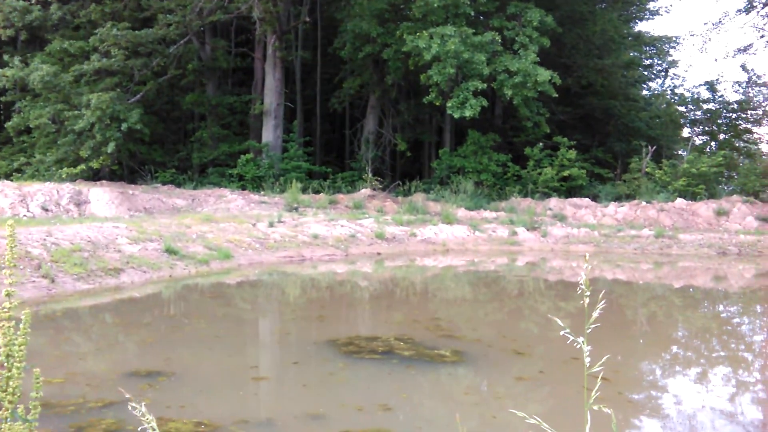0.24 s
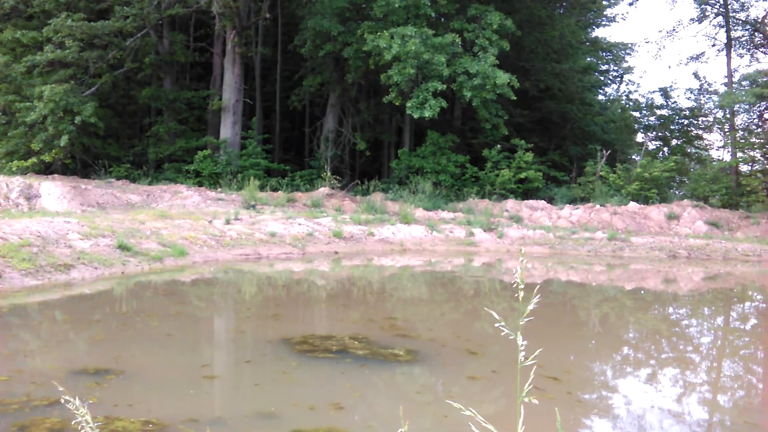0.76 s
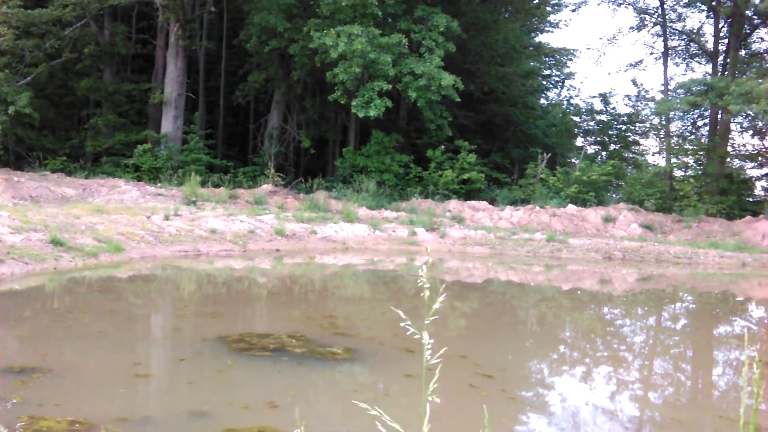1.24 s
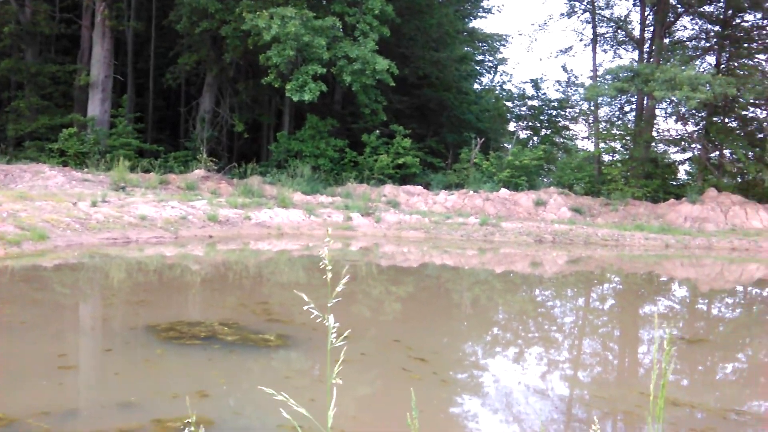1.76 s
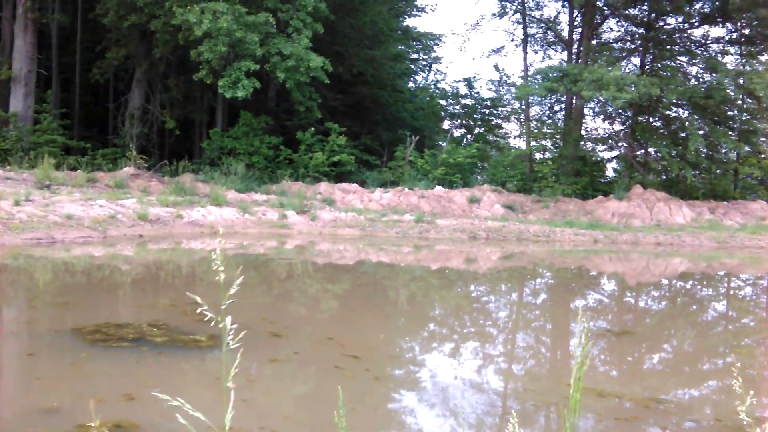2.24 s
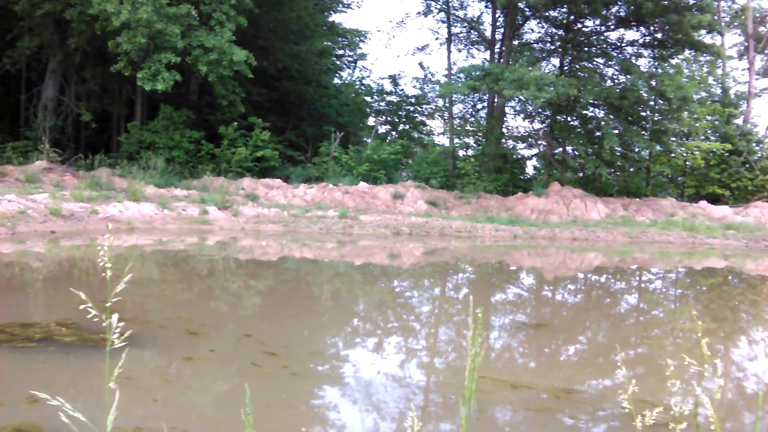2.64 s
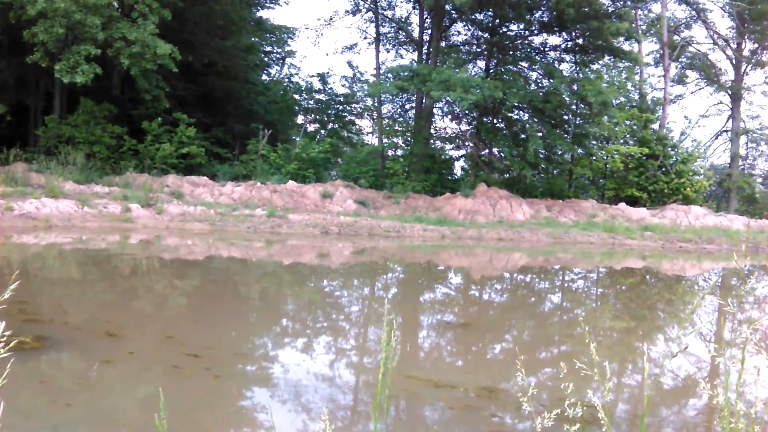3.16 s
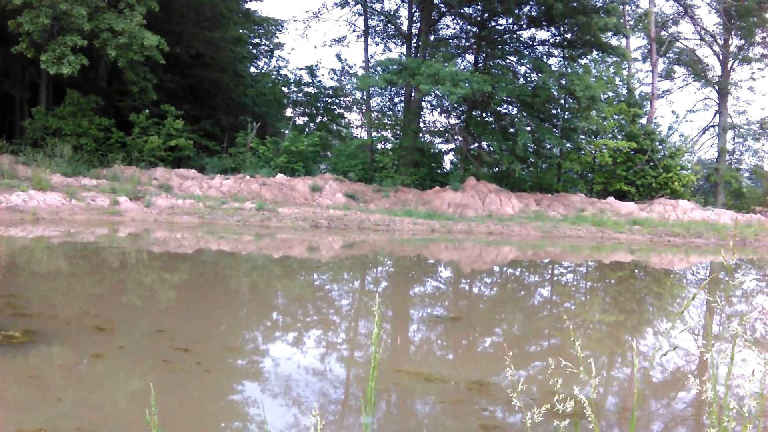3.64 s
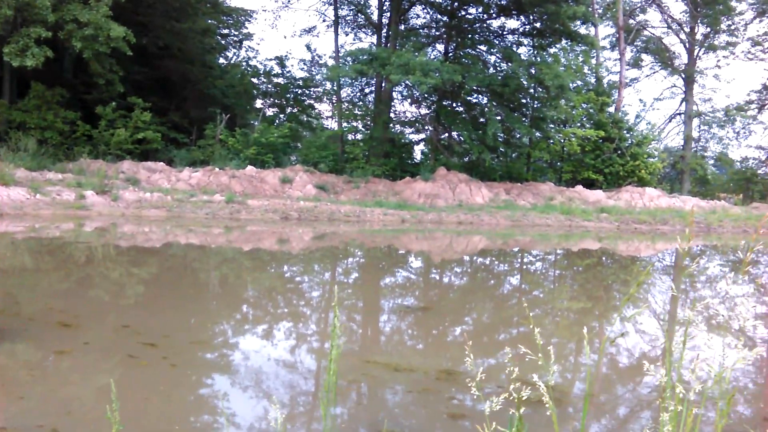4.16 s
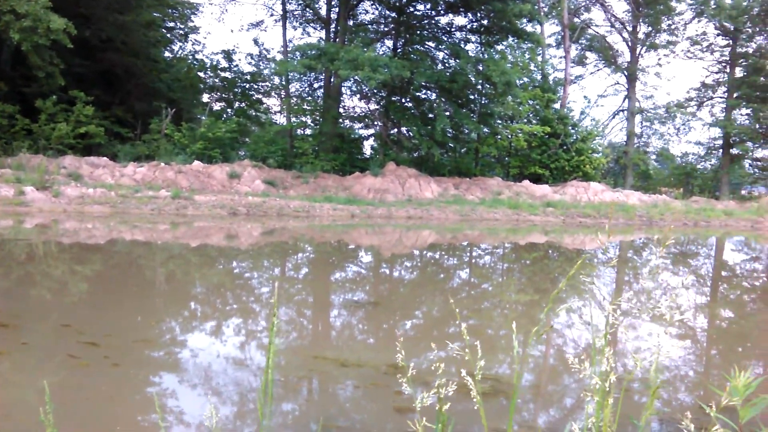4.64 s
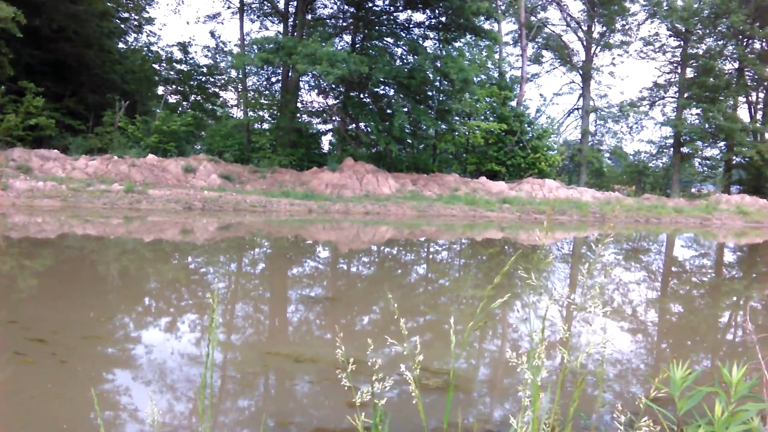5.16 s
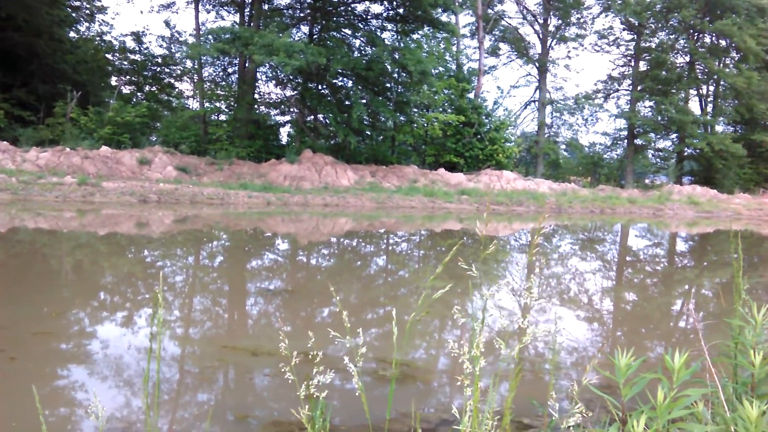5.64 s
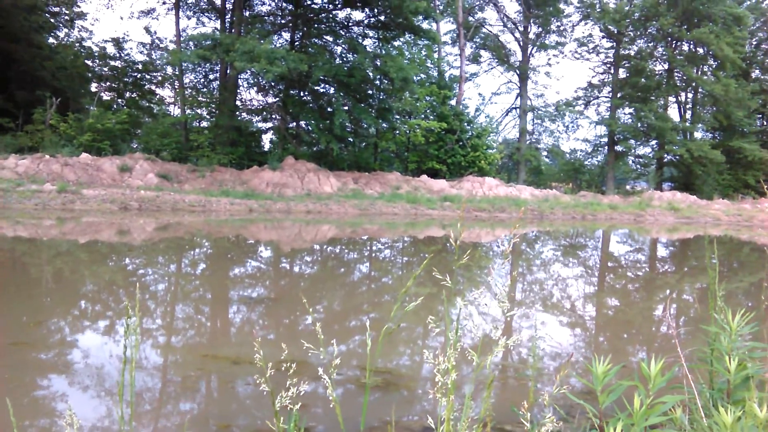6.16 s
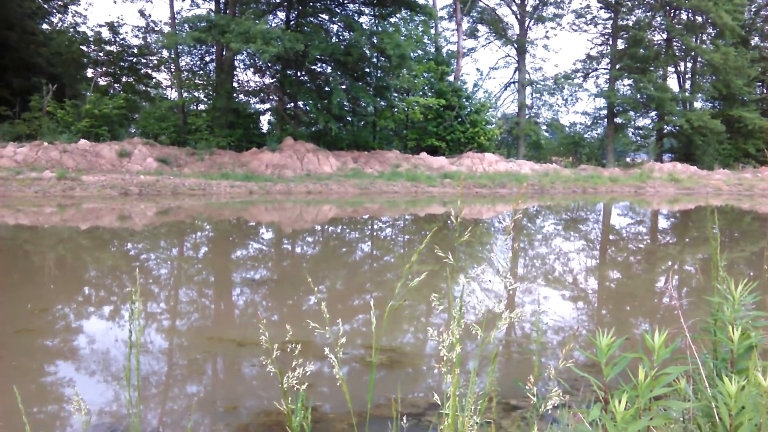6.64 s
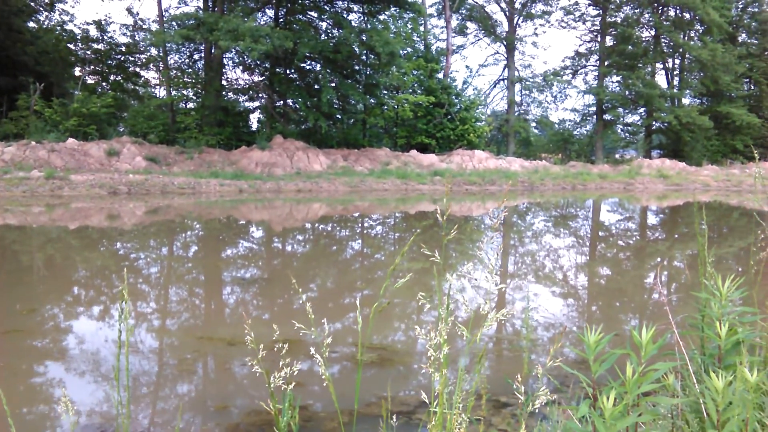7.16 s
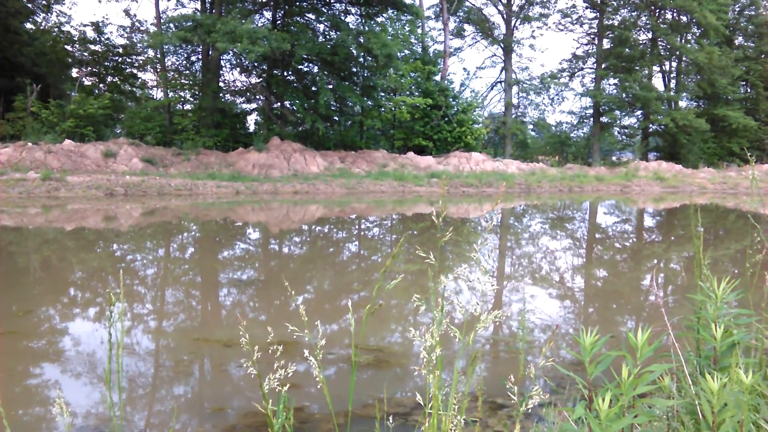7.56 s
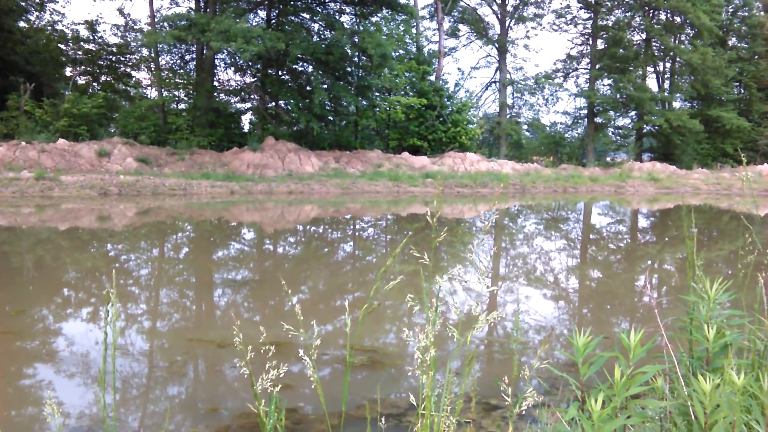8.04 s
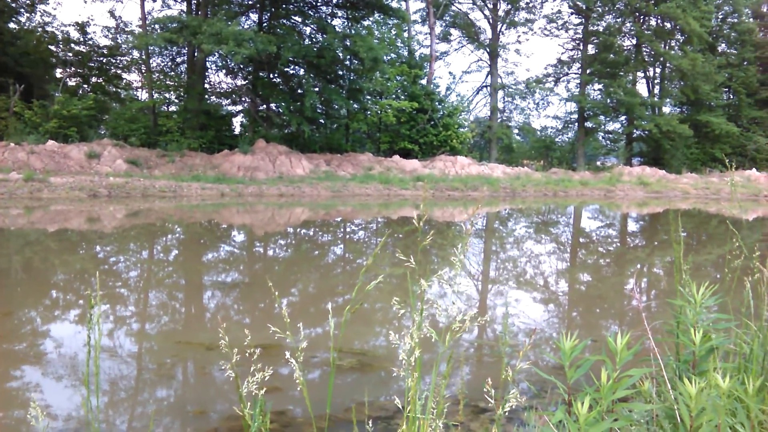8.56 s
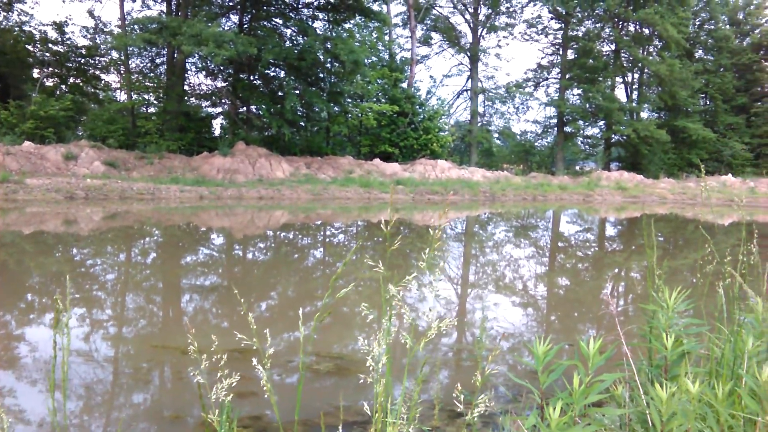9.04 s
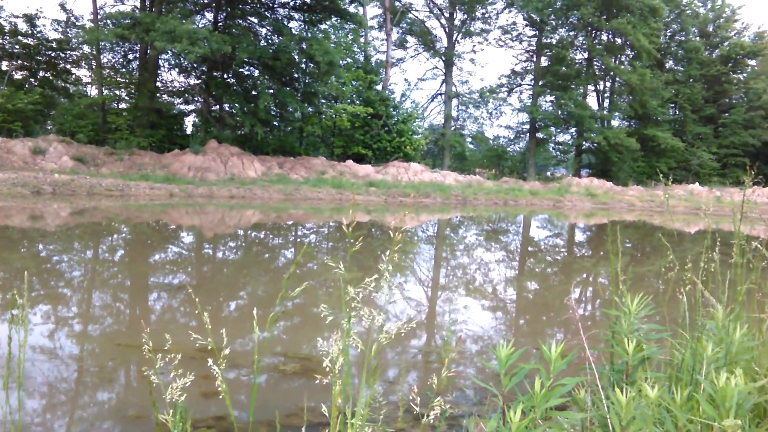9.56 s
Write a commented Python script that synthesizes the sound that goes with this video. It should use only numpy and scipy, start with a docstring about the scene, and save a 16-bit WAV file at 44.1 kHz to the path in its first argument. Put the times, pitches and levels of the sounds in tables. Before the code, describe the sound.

Crickets trill and chirp over soft wind rumble and a faint low hum beside a pond; late on, a sparrow sings a bright whistled, buzzing song.

```python
"""A sparrow to the right sings one song of whistles, buzzes and a trill; each note is a sine gliding in pitch.
The trees echo it with dying noise tails, and fainter birds whistle far off. One cricket chirps now and then.
Three more trill, swelling and fading: all the crickets are rows of short wing-stroke tones.
Behind this still pond at a wood's edge, shaped noise makes a far chorus, soft hiss and a light wind
that rumbles mostly on the right; wavering tones and a narrow noise make a distant machine's hum."""
import sys
import numpy as np
from scipy import signal
from scipy.fft import rfft, irfft
from scipy.io import wavfile
from scipy.ndimage import uniform_filter1d

SR = 44100
rng = np.random.default_rng(int(sys.argv[2]) if len(sys.argv) > 2 else 0)


def materialize(psi):
    """Save the field psi as 16-bit PCM at rate SR to the path in sys.argv[1].

    A 1-D psi becomes a single channel; in a 2-D psi each row is a channel.
    """
    bounded = np.clip(np.atleast_2d(psi).T, -1, 1)
    quanta = np.round(bounded * 32767).astype(np.int16)
    wavfile.write(sys.argv[1], SR, quanta)


N = 432173
TIME = np.arange(N) / SR


def undb(db):
    """Turn decibels into a plain gain."""
    return 10 ** (np.asarray(db) / 20)


def curve(rows):
    """Join the rows of a table with straight lines: each column after the time, one value a sample."""
    s, *columns = np.transpose(rows)
    return [np.interp(TIME, s, c) for c in columns]


def pair(pan_db):
    """Left and right gains whose mean is 1, from left minus right in dB."""
    left = np.atleast_1d(undb(pan_db))
    return 2 * np.array([left, np.ones_like(left)]) / (1 + left)


def noise(shape):
    """Unrelated noise left and right, overall rms 1, coloured by the gain shape(Hz)."""
    hz = np.arange(N // 2 + 1) * SR / N + 1  # the 1 keeps log(0) away
    spectrum = rfft(rng.standard_normal((2, N))) * shape(hz)
    x = irfft(spectrum, N)
    return x / x.std()


def colour(points):
    """A gain drawn through (f/Hz, level/dB) points, straight on a log pitch scale."""
    hz, db = np.transpose(points)
    return lambda f: undb(np.interp(np.log(f), np.log(hz), db))


def peak(hz, width):
    """A steep resonance; its gain is half at the two edges of the width in Hz."""
    return lambda f: 1 / (1 + (2 * (f - hz) / width) ** 2)


def walk(rate):
    """Random levels held 1 / rate s and smoothed twice; spread near 1."""
    k = int(SR / rate)
    steps = np.repeat(rng.standard_normal(N // k + 1), k)
    return 1.206 * uniform_filter1d(uniform_filter1d(steps, k), k)[:N]


def swell(centre, width):
    """A smooth bump in time, 1 at its centre; the width is its standard deviation in s."""
    return np.exp(-.5 * ((TIME - centre) / width) ** 2)


def add(out, rows, pan_db, lead_s, tilt_db=0, throb=(0, 0, 0, 0)):
    """Add a sine along (t/s, f/Hz, peak level/dB) rows; its phase leads on the left, its balance may tilt with pitch."""
    s, hz, db = np.transpose(rows)
    span = slice(max(int(s[0] * SR), 0), int(s[-1] * SR))
    t = TIME[span]
    rate, swing_hz, depth, lean = throb
    waver = 0.022 * np.cumsum(rng.standard_normal(len(t)))  # the throb is not quite regular
    beat = 2 * np.pi * rate * (t - s[0]) + waver
    pitch = np.interp(t, s, hz) + swing_hz * np.sin(beat)
    soft_ends = signal.windows.tukey(len(t), min(1, 0.002 * SR / len(t)))
    size = undb(np.interp(t, s, db)) * (1 - depth * np.cos(beat + lean)) * soft_ends
    left_lead = pitch * lead_s * np.array([[1], [0]])
    phase = 2 * np.pi * (np.cumsum(pitch) / SR + rng.random() + left_lead)
    out[:, span] += size * pair(pan_db + tilt_db * pitch / 1000) * np.sin(phase)


# shape of a held whistle
SETTLE, RELEASE_S = 1.7, .022  # attacks until the pitch is reached; time to let go
EARLY_SAG = .3  # share of the sag done half way
START_DB, HALF_WAY_DB, END_DB = -33, -12, -14  # start and mid-attack against the peak; end against the faded level


def held(start, length, attack, hz, scoop_hz, sag_hz, db, fade_db, half_way_db=HALF_WAY_DB, early_sag=EARLY_SAG):
    """A whistle slides up into its pitch as it swells, sags and fades while held, and is let go."""
    end, settled = start + length, start + SETTLE * attack
    let_go = end - RELEASE_S
    return np.array([(start, hz - scoop_hz, db + START_DB),
                     (start + attack / 2, hz - scoop_hz / 2, db + half_way_db),
                     (start + attack, hz - .15 * scoop_hz, db),
                     (settled, hz, db - fade_db * (SETTLE - 1) * attack / length),
                     ((settled + let_go) / 2, hz - early_sag * sag_hz, db - fade_db / 2),
                     (let_go, hz - sag_hz, db - fade_db),
                     (end, hz - sag_hz, db - fade_db + END_DB)])


# held whistles: (start t/s, length/s, attack/s, pitch f/Hz, slide up f/Hz, sag f/Hz, peak level/dB, fade/dB)
HELD_WHISTLES = [(7.339, 0.214, 0.03, 7904, 497, 91, -31.5, 3),
                 (7.726, 0.249, .038, 7720, 423, 150, -27, 7.5)]
# lower whistles with a faint octave: same columns
FLUTED_NOTES = [(8.008, 0.18, 0.021, 4546, 120, 30, -40, 19), (8.305, 0.15, .017, 4484, 30, -5, -32.5, 24)]
# the upper tone of the fast buzz that lingers: one row, same columns
LINGERING_TONE = (9.535, .11, .015, 2755, 20, 10, -52, 5)
# closing glides, a list of rows for each: (t/s, f/Hz, rms level/dB)
CLOSING_GLIDES = [
    [(9.577, 9600, -62), (9.586, 8300, -70), (9.603, 7400, -63), (9.63, 7130, -50), (9.645, 7300, -44),
     (9.657, 7750, -43), (9.668, 8120, -49)],
    [(9.6, 6914, -64), (9.63, 6850, -51), (9.645, 6865, -47), (9.656, 6970, -46)],
    [(9.714, 8300, -63), (9.717, 7200, -49), (9.721, 6400, -53)],
    [(9.725, 3597, -68), (9.742, 3860, -54), (9.756, 3850, -46), (9.768, 3700, -58)],
    [(9.738, 4150, -66), (9.755, 4180, -55), (9.772, 4150, -54)],
]
# glide that leads into the rasp: (t/s, f/Hz, rms level/dB)
RASP_SCOOP = [(8.062, 2950, -61), (8.068, 3200, -45), (8.072, 3270, -46)]
# short chips: (t/s, base level/dB, base f/Hz)
CHIP_EVENTS = [(7.2784, -50, 3230), (7.6674, -45, 3240), (8.0162, -49, 6300), (8.3044, -52, 6190)]
# quick rise of each chip: (t/s from its start, pitch ratio, level/dB against its base)
CHIP_SHAPE = [(0, .95, -11), (.005, 0.993, 3), (.009, 1.02, -3), (.015, 1.025, -14)]
# trill syllables, each a flick and a hook: (t/s, base level/dB)
TRILL_SYLLABLES = [(8.644, -27.5), (8.7321, -24.5), (8.8175, -24.5), (8.904, -24.5), (8.988, -25.5),
                   (9.0735, -25.5), (9.1603, -26.5)]
# templates around one event: (t/s from the event, f/Hz, level/dB against its base)
FLICK_SHAPE = [(-.0125, 6540, -23), (-.0105, 7100, -11), (-.008, 8300, -18)]
HOOK_SHAPE = [(-.001, 6370, -19), (.003, 7160, -5), (.008, 7600, -2), (.013, 7700, -10), (.017, 7520, -15)]
DROP_SHAPE = [(-.0015, 4400, -13), (.001, 3920, -12), (.003, 3600, -2.5), (.0075, 3400, -10)]
ARCH_SHAPE = [(-.004, 2027, -8), (0, 3009, -4), (.003, 2530, 3), (.006, 2200, -11), (.012, 1823, -22)]
# every rasp beat is a rising blip and a thin tick above it: same columns
BLIP_SHAPE = [(-.0035, 3200, -11), (-.001, 3330, -2), (.001, 3550, -2), (.003, 3540, -3)]
TICK_SHAPE = [(.004, 4300, -22), (.005, 3950, -13), (.0062, 3600, -18)]
# fast buzz: (t/s, middle f/Hz, peak level/dB before the throb)
FAST_BUZZ = [(9.328, 2550, -58), (9.345, 2490, -37), (9.406, 2540, -38), (9.53, 2485, -47.5),
             (9.538, 2520, -68)]
# rate per s, pitch swing in Hz, loudness depth 0-1, radians the loudness leans to the high side
BUZZ_THROB = 245, 223, 0.28, 0.4
SONG_PAN_DB, SONG_PAN_DB_PER_KHZ, SONG_LEAD_S = -5, -2, 0.00011  # negative pan is to the right
OCTAVE_DB = -29  # against the fluted note
DROP_AFTER_S, DROP_DB, LAST_DROP_S = .0396, -36, 9.2928  # a drop follows each hook; one more closes the trill
ARCH_FIRST_S, ARCH_PERIOD_S, ARCH_DB, LAST_ARCH_DB = 8.398, .0179, -40.5, -45  # slow buzz of arched notes
RASP_FIRST_S, RASP_LAST_S, RASP_PERIOD_S = 8.0733, 8.262, 0.0087
RASP_DB, RASP_FADE_DB_S = -32.5, 64.5  # base level of the first beat; fade in dB per s


def sparrow():
    """Whistles are gliding sines of one shape; repeated syllables follow one template each, slightly varied."""
    out, crest_db = np.zeros((2, N)), 10 * np.log10(2)  # a sine's peak over its rms
    place = SONG_PAN_DB, SONG_LEAD_S, SONG_PAN_DB_PER_KHZ
    for note in HELD_WHISTLES + FLUTED_NOTES + [LINGERING_TONE]:
        add(out, held(*note), *place)
    for note in FLUTED_NOTES:
        add(out, held(*note) * (1, 2, 1) + (0, 0, OCTAVE_DB), *place)
    for glide in CLOSING_GLIDES + [RASP_SCOOP]:
        add(out, np.add(glide, (0, 0, crest_db)), *place)
    for s, db, hz in CHIP_EVENTS:
        add(out, np.multiply(CHIP_SHAPE, (1, hz, 1)) + (s, 0, db), *place)

    beats = np.arange(RASP_FIRST_S, RASP_LAST_S, RASP_PERIOD_S)
    rasp = np.transpose([beats, RASP_DB - RASP_FADE_DB_S * (beats - RASP_FIRST_S)])
    drops = [(s + DROP_AFTER_S, DROP_DB) for s, _ in TRILL_SYLLABLES] + [(LAST_DROP_S, DROP_DB)]
    arches = [(ARCH_FIRST_S + k * ARCH_PERIOD_S, ARCH_DB if k < 11 else LAST_ARCH_DB) for k in range(12)]
    syllables = ((TRILL_SYLLABLES, FLICK_SHAPE), (TRILL_SYLLABLES, HOOK_SHAPE), (drops, DROP_SHAPE),
                 (arches, ARCH_SHAPE), (rasp, BLIP_SHAPE), (rasp, TICK_SHAPE))
    for events, shape in syllables:
        for s, db in events:
            sharp, loud = rng.standard_normal(2)
            varied = np.multiply(shape, (1, 1 + 0.0066 * sharp, 1))
            add(out, varied + (s, 0, db + 0.94 * loud), *place)
    add(out, FAST_BUZZ, *place, throb=BUZZ_THROB)
    return out


# cricket chirps: (first stroke t/s, last stroke t/s, mean f/Hz, full level/dB, left minus right level/dB)
CRICKET_CHIRPS = [(0.9184, 1.067, 6470, -37, -9), (2.261, 2.389, 6390, -37.5, -6),
                  (3.741, 3.8684, 6368, -41, -4.5), (5.011, 5.1091, 6240, -40.5, -5),
                  (6.345, 6.467, 6370, -39, -6), (7.684, 7.8147, 6367, -39.5, -9),
                  (8.7637, 8.8935, 6370, -39.5, -7)]
# one wing stroke: (t/s from the stroke, pitch ratio, level/dB against the chirp)
WING_STROKE = [(-.0028, 1.05, -16), (-.001, 1.015, -3), (.0003, 1.0, 0), (.0018, .97, -4), (.004, .91, -15)]
CHIRP_PERIOD_S = .0099  # roughly, from stroke to stroke


def chirping_cricket():
    """Wing strokes that grow, slow down and rise a little in pitch through each chirp, with a faint scrape."""
    out = np.zeros((2, N))
    for first, last, hz, db, pan_db in CRICKET_CHIRPS:
        for u in np.linspace(0, 1, round((last - first) / CHIRP_PERIOD_S) + 1):  # u: 0 to 1 through the chirp
            late, sharp, loud = rng.standard_normal(3)
            s = first + (last - first) * (u - 0.059 * u * (1 - u)) + 0.00044 * late
            pitch = hz * (1 + 0.019 * (u - .5) + 0.009 * sharp)
            stroke_db = db - 9 * np.exp(-u / 0.21) + 0.74 * loud
            add(out, np.multiply(WING_STROKE, (1, pitch, 1)) + (s, 0, stroke_db), pan_db, .00013)
    # the wing also scrapes: faint high noise that follows each stroke
    scrape_colour = colour([(5500, -30), (5900, 3), (7000, 10), (8000, 1), (13500, -8.5), (15000, -20)])
    scrape = uniform_filter1d(np.abs(out), size=40) * noise(scrape_colour)
    return out + undb(-17.0) * scrape


# far whistles: (start t/s, length/s, attack/s, pitch f/Hz, slide up f/Hz, sag f/Hz, peak level/dB, fade/dB)
FAR_WHISTLES = [(.15, .09, .016, 3400, 40, 140, -63, 2), (1.05, .17, 0.028, 3560, 560, 120, -68.5, 2),
                (1.222, 0.13, .022, 3330, 330, 90, -62, 6), (1.91, 0.089, .016, 2880, 0, 40, -62, 5),
                (4.385, .21, .035, 3540, 450, 90, -63.5, 9.3), (5.2, 0.16, 0.0297, 3540, 450, 90, -62, 3)]
FAR_HALF_WAY_DB, FAR_EARLY_SAG = -3, 0.91  # far birds swell sooner and drop early


def far_birds():
    """Faint whistles from deep in the wood: sines that slide up, sag and fade."""
    out = np.zeros((2, N))
    for note in FAR_WHISTLES:
        add(out, held(*note, FAR_HALF_WAY_DB, FAR_EARLY_SAG), -1.5, 0)
    return out


TREES_T60_S, TREES_DB = 0.56, -13.5  # time for a 60 dB decay; echo gain
LOW_TREES_T60_S, LOW_TREES_DB = 1.5, -5.5


def trees(x, t60_s, low_hz, top_hz):
    """Trunks and leaves scatter one band into a patchy, dying tail, unlike on the two sides."""
    t = TIME[:SR]  # the tail is cut at 1 s
    patchy_decay = undb(-60 * t / t60_s + 3.9 * walk(61.07)[:SR])
    tail = rng.standard_normal((2, SR)) * patchy_decay * np.minimum(t / 0.0032, 1)
    tail = tail / np.sqrt(np.sum(tail ** 2, axis=1, keepdims=True))
    band_filter = signal.butter(4, (low_hz, top_hz), "band", fs=SR, output="sos")
    band = signal.sosfilt(band_filter, x.mean(axis=0, keepdims=True))
    return pair(-7.0) * signal.fftconvolve(band, tail, axes=1)[:, :N]


# three trilling crickets: ([(t/s, level/dB) rows], f/Hz, left minus right level/dB)
HIGH_TRILL = [(0, -74), (2.3, -72), (3.05, -63.5), (4.5, -58.5), (5.3, -63.5), (6.8, -60), (8.7, -57),
              (9.5, -60.5), (9.8, -69)], 5420, -3
LOW_TRILL = [(0, -76), (1.03, -78), (1.09, -67), (1.9, -64.5), (4.4, -67), (4.7, -76), (5.05, -78),
             (5.4, -70), (9.8, -65.5)], 5115, -8
TOP_TRILL = [(0, -76), (1.8, -79), (2.4, -65), (3.1, -64.5), (4.1, -69), (4.5, -78), (5.6, -66.5),
             (6.8, -74), (7.5, -85)], 5530, -15
# their wing beats: (t/s, strokes counted so far, before a small waver and a fixed shift)
HIGH_COUNT = [(0, 4.03), (7.0, 287.47), (9.8, 400.6)]
LOW_COUNT = [(0, .3), (1.2, 50.38), (4.4, 183.87), (6.0, 250.5), (9.8, 408.87)]
TOP_COUNT = [(0, -1.05), (1.4, 57.75), (9.8, 410.3)]


def trilling_cricket(rows, hz, pan_db, strokes, duty, lead_s):
    """Each wing stroke is a short tone that sags in pitch; grass and distance smear part of it into a narrow hiss."""
    db = curve(rows)[0]
    count = curve(strokes)[0] + 0.045 * walk(6) + duty / 2 + 2
    part = count % 1 / duty  # 0 to 1 while the wing sounds
    chance = rng.standard_normal((N // 500, 2))[count.astype(int)].T  # one pitch and one level draw a stroke
    pitch = hz * (1 + 0.003035 * chance[0] - .008 * np.clip(part - .5, -.5, .5))
    phase = 2 * np.pi * (np.cumsum(pitch) / SR + hz * lead_s * np.array([[1], [0]]))
    stroke = np.sin(np.pi * np.clip(part, 0, 1)) ** 0.5
    tone = undb(0.56 * chance[1]) * stroke * np.sin(phase)
    smear = undb(-4) * noise(peak(hz, 240)) * (.6 + stroke)
    return undb(db) * pair(pan_db) * (tone / tone.std() + smear)


# main tone of the machine: (t/s, level/dB before a small waver)
HUM_LEVEL = [(0, -57), (.36, -61), (.45, -52.5), (.9, -47), (1.25, -51.5), (1.6, -48), (2.06, -49.5),
             (2.18, -62), (3.35, -59.5), (3.5, -54), (4.0, -52.5), (4.08, -59.5), (4.9, -61.5), (5.19, -78),
             (5.5, -60), (7.4, -55.5), (8.3, -56), (9.3, -47.5), (9.7, -52), (9.8, -58)]
# rough lower tone: (t/s, level/dB)
LOW_HUM_LEVEL = [(0, -52), (.4, -56), (1.4, -59.5), (1.9, -67), (4.4, -65.5), (5.1, -73), (7.8, -63.5),
                 (9.8, -64)]
# the octave comes and goes: (centre t/s, length/s, peak level/dB above a faint steady part)
OCTAVE_BUMPS = [(.15, 0.17, -68), (1.057, 0.57, -67), (1.685, 0.23, -69.5), (2.622, 0.17, -71),
                (3.848, 0.48, -69), (7.15, 0.35, -69), (7.647, 0.31, -69.5), (9.051, 0.31, -66.5),
                (9.5, 0.32, -67)]
HUM_HZ, HUM_SAG_HZ_S, HUM_WAVER_HZ = 157.8, .5, .3  # start pitch, sinking in Hz per s, random waver
HUM_OCTAVE_DB = -85  # between swells


def hum():
    """A distant machine: a slowly sinking tone with its octave, and a rough one below made of narrow noise."""
    hz = HUM_HZ - HUM_SAG_HZ_S * TIME + HUM_WAVER_HZ * walk(2.977)
    phase = 2 * np.pi * np.cumsum(hz) / SR + np.array([[.2], [0]])
    octave_size = undb(HUM_OCTAVE_DB) + sum(undb(db) * swell(s, 0.34 * length) for s, length, db in OCTAVE_BUMPS)
    low = undb(curve(LOW_HUM_LEVEL)[0]) * noise(peak(116.6, 4.5))[0]
    tone = undb(curve(HUM_LEVEL)[0] + 1.4 * walk(8.7)) * np.sin(phase)
    octave = octave_size * np.sin(2 * phase)
    return np.sqrt(2) * pair(-1.8) * (tone + octave) + low


# breeze: (t/s, level/dB before gusts, left minus right level/dB)
BREEZE = [(0, -44.5, -12), (.7, -53.5, -4), (1.7, -45, -7.5), (2.7, -51, -9), (3.0, -56.5, -5),
          (6, -59.5, -4), (9.8, -57, -3)]
# tone colour of breeze and puffs: (f/Hz, relative level/dB)
BREEZE_COLOUR = [(11, -42), (18, -13), (49, 7.5), (129, -6.5), (161, -11), (188, -17.5), (317, -35),
                 (400, -31), (520, -37), (880, -120)]
# single puffs, most of them stronger on one side: (t/s, level/dB, left minus right level/dB)
PUFFS = [(.3, -40.5, -22), (.41, -43.5, -8), (.52, -47.5, -14), (.65, -44.5, -10), (1.34, -55, -4),
         (2.07, -46, -24), (2.24, -39, -25), (2.32, -45, -20), (2.451, -44, -22.5), (2.61, -44.5, -16),
         (2.89, -57, -10), (3.74, -47.5, -4), (3.93, -54, -16), (5.32, -47.5, 8.5), (9.44, -48, 0)]
# tone colour of the far rumble: (f/Hz, relative level/dB)
RUMBLE_COLOUR = [(11, -21), (18, -11.5), (43, -2.5), (113, -5), (157, -9.5), (177, -11.5), (205, -16),
                 (330, -30), (430, -52), (730, -120)]
PUFF_WIDTH_S, GUSTS_DB, RUMBLE_DB = 0.027, 1.5, -54.5


def wind():
    """Gusty low noise unlike on the two sides, with single puffs, over a nearly steady far rumble that both share."""
    db, pan_db = curve(BREEZE)
    breeze = undb(db + GUSTS_DB * walk(12)) * pair(pan_db)
    puffs = sum(undb(puff_db) * pair(side_db) * swell(s, PUFF_WIDTH_S) for s, puff_db, side_db in PUFFS)
    near = (breeze + puffs) * noise(colour(BREEZE_COLOUR))
    return near + undb(RUMBLE_DB + 1.1 * walk(6)) * noise(colour(RUMBLE_COLOUR))[0]


# chorus, far crickets and thin high insect: (t/s, level/dB before random throbbing)
CHORUS_LEVEL = [(0, -70), (1.3, -65.5), (2.2, -68), (2.5, -73), (3.0, -78.5), (4.5, -70), (4.8, -75),
                (6.4, -69.5), (7.5, -72.5), (8, -71)]
FAR_CRICKET_LEVEL = [(0, -64), (1.5, -65), (3.5, -63.5), (6, -62.5), (8, -64), (9.8, -56)]
THIN_INSECT_LEVEL = [(0, -84), (1.9, -85), (2.3, -79), (4.7, -82), (5.8, -76), (6.8, -84), (7.8, -85),
                     (8.2, -75)]
# chorus bands: (middle f/Hz, width f/Hz, level/dB against the chorus)
CHORUS_BANDS = [(2327, 430, -1.5), (2613, 440, 0), (3212, 790, -5.5)]


def chorus():
    """Many far frogs and insects blur into throbbing bands of noise."""
    bands = sum(undb(db + 3.1 * walk(25) + 1.0 * walk(2.75)) * noise(peak(hz, w)) for hz, w, db in CHORUS_BANDS)
    cricket_colour = colour([(4800, -23.5), (5100, -4), (5350, 2), (5600, 1), (5850, -30)])
    cricket_size = undb(curve(FAR_CRICKET_LEVEL)[0] + 1.3 * walk(30))
    crickets = cricket_size * pair(-6.5) * noise(cricket_colour)
    thin = undb(curve(THIN_INSECT_LEVEL)[0] + 2.0 * walk(40)) * noise(peak(11000, 150))
    return undb(curve(CHORUS_LEVEL)[0]) * pair(-5.5) * bands + thin + crickets


# dull hiss: (t/s, level/dB)
MURMUR_LEVEL = [(0, -70), (.85, -73), (.95, -65), (2, -71), (7.9, -81), (8.3, -68), (9, -73), (9.5, -67.5),
                (9.8, -76)]


def murmur():
    """A dull hiss that comes and goes: noise in a broad band near 1.5 kHz."""
    return undb(curve(MURMUR_LEVEL)[0]) * noise(peak(1540, 2200))


# tone colour of the air: (f/Hz, relative level/dB)
AIR_COLOUR = [(110, -39), (180, -3.5), (380, -11.5), (1430, -18.5), (2460, -18), (4150, -20.5), (4820, -18),
              (5390, -14), (6260, -23), (10800, -25.5), (15600, -31)]
AIR_DB = -57


def air():
    """A soft wide hiss: coloured noise whose level wavers slightly."""
    return undb(AIR_DB + 0.83 * walk(6)) * noise(colour(AIR_COLOUR))


def scene():
    """Add up the callers, their echo among the trees, and the background."""
    song, far, chirps = sparrow(), far_birds(), chirping_cricket()
    calls = song + undb(-1.0) * far + undb(-17) * chirps
    # leaves and air swallow the treble sooner, so low notes ring on longer
    echo = undb(TREES_DB) * trees(calls, TREES_T60_S, 4600, 12000)
    echo = echo + undb(LOW_TREES_DB) * trees(calls, LOW_TREES_T60_S, 2730, 6300)
    crickets = trilling_cricket(*HIGH_TRILL, HIGH_COUNT, .5, 2.0e-5)
    crickets = crickets + trilling_cricket(*LOW_TRILL, LOW_COUNT, .55, 0)
    crickets = crickets + trilling_cricket(*TOP_TRILL, TOP_COUNT, .55, 0)
    return song + far + chirps + echo + crickets + chorus() + hum() + wind() + air() + murmur()


TOP_HZ = 15780


def record(dry):
    """The recorder adds a small steady offset and cuts the top."""
    top_cut = signal.ellip(10, .2, 60, TOP_HZ, fs=SR, output="sos")
    return signal.sosfilt(top_cut, dry + 0.0026)


dry = scene()
out = record(dry)
materialize(out)
```